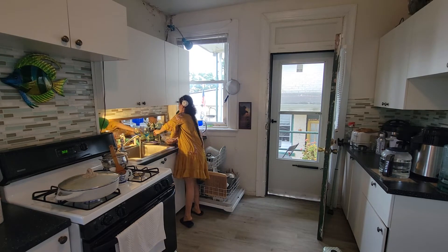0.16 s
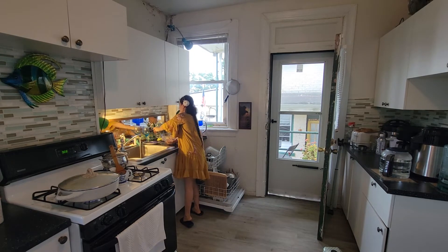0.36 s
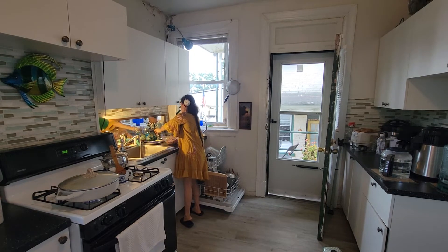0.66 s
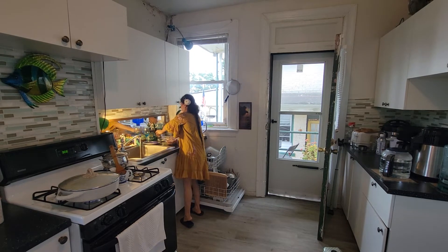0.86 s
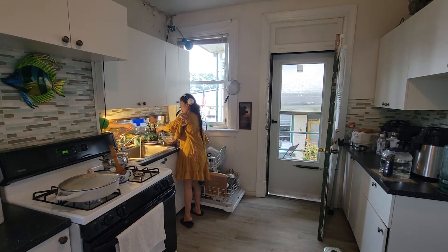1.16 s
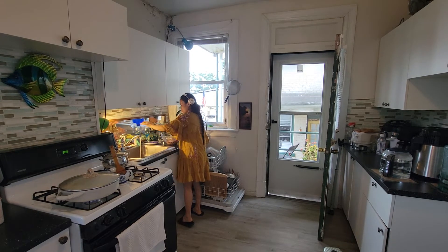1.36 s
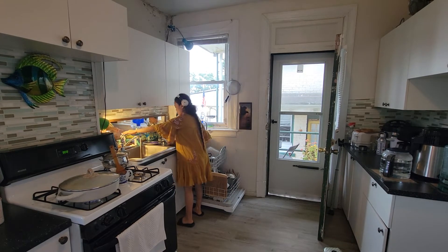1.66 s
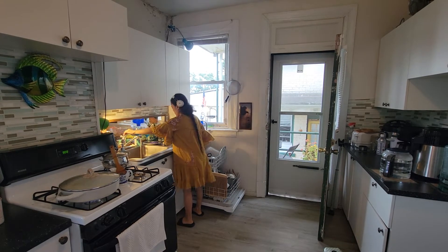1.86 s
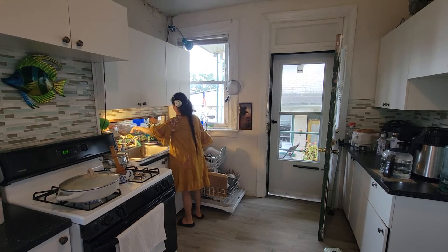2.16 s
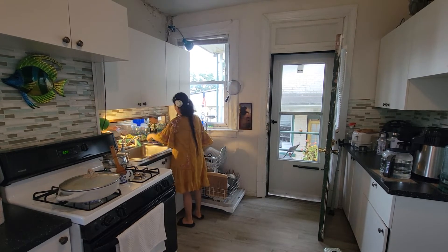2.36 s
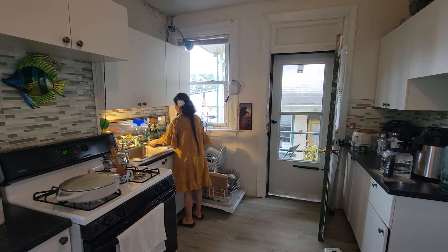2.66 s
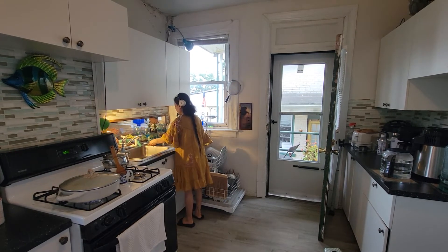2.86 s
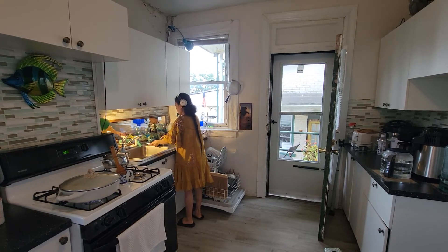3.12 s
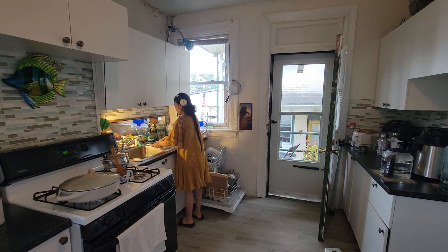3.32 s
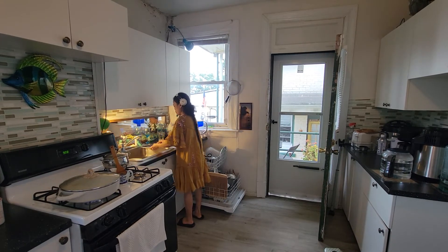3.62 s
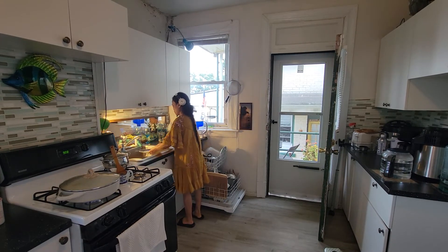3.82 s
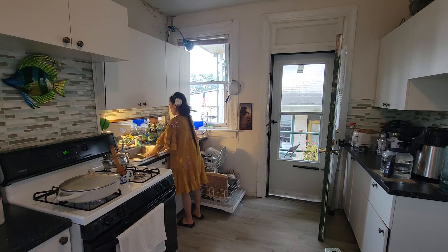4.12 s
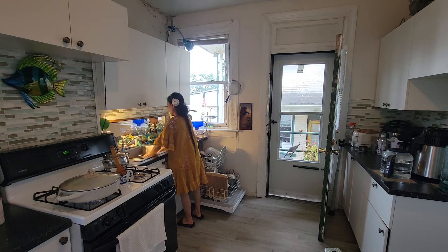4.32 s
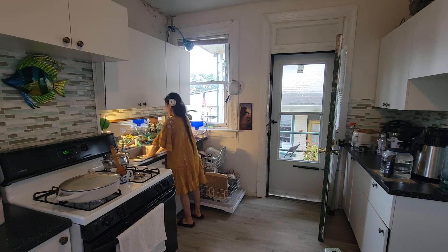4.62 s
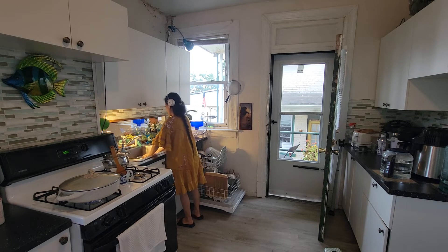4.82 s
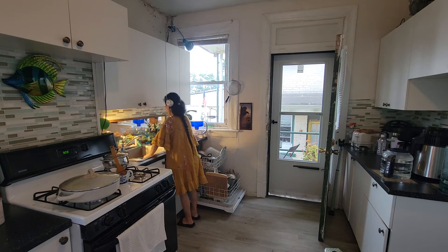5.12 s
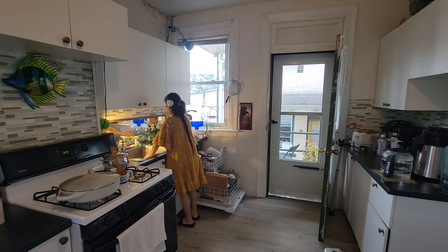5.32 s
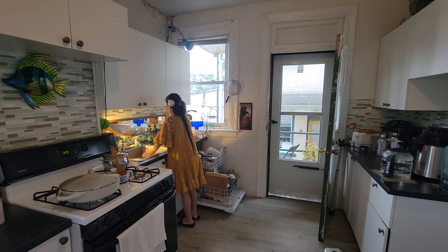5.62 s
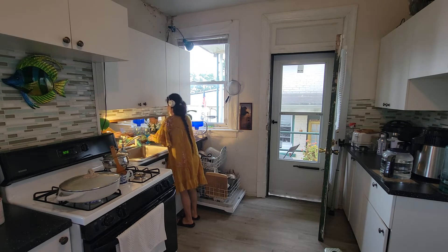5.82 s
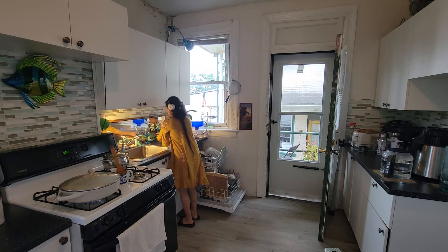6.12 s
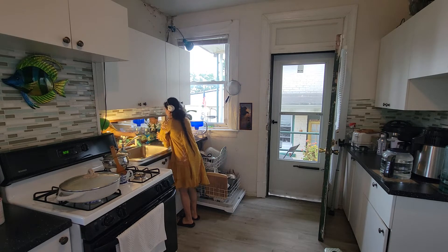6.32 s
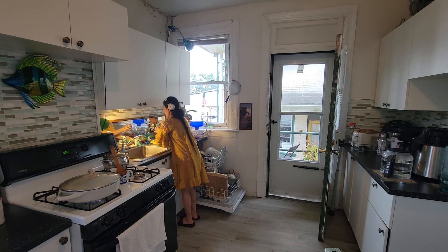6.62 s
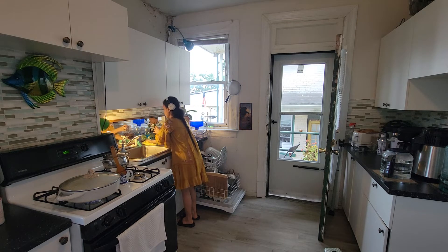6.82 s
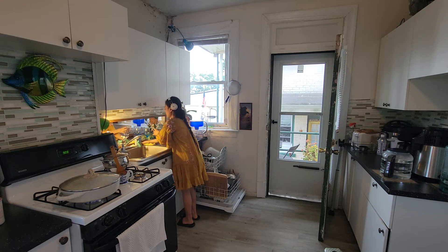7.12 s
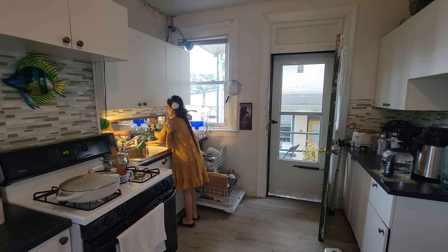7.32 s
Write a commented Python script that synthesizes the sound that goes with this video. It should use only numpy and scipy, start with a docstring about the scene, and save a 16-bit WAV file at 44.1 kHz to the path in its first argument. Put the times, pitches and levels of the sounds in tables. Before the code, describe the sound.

Dishes and cutlery knock, clatter and scrape in a steel sink after a thin tap stream shuts off, in a small quiet kitchen.

```python
"""A small hard-walled kitchen, heard from across the room by two close microphones: washing up in a steel sink.
Soft air noise and an appliance hum lie behind a thin tap stream, shaped noise that is shut off early on.
Dishes are knocked, set down and slid: contact pulses excite short clacks and decaying modes, random slips
make the rub, and the basin booms in a few low modes. Clacks, slides and splashes arrive by way of the walls."""
import sys
import numpy as np
from scipy import signal
from scipy.fft import rfft, irfft
from scipy.io import wavfile
from scipy.ndimage import uniform_filter1d

SR = 44100
rng = np.random.default_rng(int(sys.argv[2]) if len(sys.argv) > 2 else 0)


def output_pcm(signal):
    """Save a mono or channel-first signal as 16-bit PCM at the path in sys.argv[1].

    Samples are clipped to [-1, 1] before scaling.
    """
    pcm = np.clip(np.atleast_2d(signal).T, -1, 1) * 32767
    wavfile.write(sys.argv[1], SR, np.round(pcm).astype(np.int16))


N = 329781
TIME = np.arange(N) / SR
TAIL = TIME[:32768]  # time axis of every impulse response
TOP_HZ = 15850

# air of the room and a fainter hiss above it: (frequency [Hz], relative level [dB])
ROOM_TONE = [(15, -47), (25, -18), (40, -29), (59, 3), (90, -16.5), (125, -9), (156, -8.5), (362, -6.5),
             (437, -8.5), (1050, -12.5), (1500, -17), (1950, -43), (3300, -120)]
HISS = [(880, -27), (1500, -5.5), (1820, -1.5), (2920, -6), (3480, -6.5), (3990, -11), (6620, -12),
        (11200, -26.5), (15500, -21)]
ROOM_TONE_DB, HISS_DB = -53.5, -62.5
# appliance hum: (frequency [Hz], rms level [dB])
HUM = [(59.5, -73.5), (123, -67), (226, -69), (528, -69), (1039, -78)]
# spacing of the diffuse field at the microphones: (frequency [Hz], side minus mid [dB])
WIDTH = [(60, -11), (110, -18), (200, -8), (380, -2.5), (700, 1), (1290, 4.5), (2380, 0.5), (4400, 0),
         (15000, 0)]
# room; the treble is shadowed most and builds up more slowly: (frequency [Hz], t60 [s], build-up [s])
ROOM_DECAY = [(100, 0.49, 0.0012), (407, 0.33, 0.0014), (1500, 0.38, 0.001), (5000, 0.39, 0.0042),
              (8000, 0.38, 0.0026), (14000, 0.3, 0.0033)]

# tap stream: (time [s], level [dB])
TAP_FLOW = [(0, -48), (1.0, -47.5), (1.75, -48.5), (2.03, -50.5), (2.08, -55), (2.16, -55), (2.3, -72),
            (2.4, -120)]
# colour of its hiss: (frequency [Hz], relative level [dB])
TAP_COLOUR = [(250, 4), (500, 4), (1200, 6), (2300, 0.5), (3600, 2.5), (5200, 0), (7200, 3), (11000, -3),
              (15500, -0.5)]
# singing bands of the valve: (frequency [Hz], width [Hz], level against the hiss [dB])
TAP_PIPE = [(1635, 42, -13.5), (1920, 145, -10.5), (2792, 39, -17)]
# water spattering off a dish: (time [s], frequency [Hz], level [dB])
SPLASHES = [(.275, 3600, -50.5), (1.145, 3750, -53.5), (2.015, 2920, -54.5), (2.124, 2480, -55)]

# steel basin and the cabinet under it:
# (frequency [Hz], struck on the floor [dB], struck on the wall [dB], t60 before the hold factor [s])
SINK = [(65.3, -2.5, -19, 0.29), (123.5, 1, -11, 0.266), (158.1, 7.5, 2, 0.27), (194.3, 1.5, 4, 0.21),
        (233.3, -9, -10.5, 0.44), (364.5, -16.5, -16, 0.53)]
# heavy nudges of the basin, more boom than clack: (time [s], sink boom [dB], place)
BUMPS = [(1.639, -50.5, "wall"), (1.987, -51.5, "wall"), (2.436, -39, "floor"), (2.474, -36, "floor"),
         (2.59, -39.5, "wall"), (3.06, -51, "wall"), (3.181, -48, "wall"), (3.298, -36, "wall"),
         (3.455, -31.5, "wall"), (4.886, -52, "wall")]
BUMP_CLACK_DB, BUMP_BRIGHT_HZ = -3.5, 800  # clack against boom, contact brightness

# a rim catches and squeaks as it speeds up: (time [s], pitch [Hz], level [dB])
SQUEAK = [(4.915, 1430, -69), (4.945, 1490, -42), (4.974, 1695, -40), (4.999, 1700, -38), (5.03, 1770, -51)]
# dishes dragged over the sink floor, the last stopping short of its fastest:
# (start [s], fastest [s], end [s], level [dB], brightness [Hz], singing against rub [dB],
#  favoured pitch at the start [Hz], at the end [Hz])
SLIDES = [(2.66, 3.27, 3.7, -55, 7000, -6, 2000, 3000), (3.354, 3.457, 3.62, -38, 14000, -30, 2500, 2500),
          (4.6, 4.688, 4.73, -32.5, 10000, -5.5, 2190, 3200),
          (4.867, 4.977, 5.097, -33.5, 7000, -2, 1360, 4000),
          (5.395, 5.466, 5.42, -39.5, 3000, -4, 2400, 2000)]
# colour of the rub: (frequency [Hz], relative level [dB])
SLIDE_COLOUR = [(120, -20), (200, 3.5), (400, -18.5), (1000, -1), (1550, 2), (2300, -3.5), (3000, -6.5),
                (4000, -3.5), (7000, -10), (10000, -21), (15000, -23)]
# modes that sing under the rub: (frequency [Hz], relative level [dB], t60 [s])
SLIDE_RING = [(1460, -5, 0.067), (1700, -1, 0.091), (2170, -3.5, 0.034), (2520, 4, 0.034), (2820, 5, 0.02),
              (3700, 3, 0.029), (4040, 1, 0.03), (4740, -14, 0.025)]

# single knocks of a piece in the hand:
# (time [s], piece, level [dB], sink boom [dB], contact brightness [Hz])
KNOCKS = [(.877, "tub", -33.5, -38.5, 1500), (2.15, "pot", -58, -63, 3000), (2.516, "pot", -36, -45, 900),
          (2.80, "dish", -52, -55, 5000), (3.352, "dish", -34.5, -50, 4000), (3.432, "pot", -41, -36, 5000),
          (3.525, "pot", -39.5, -44, 4460), (3.637, "fork", -45, -67, 12200),
          (3.723, "plate", -25.5, -27, 14000), (4.34, "spoon", -44.5, -74, 16000),
          (4.352, "spoon", -42.5, -74, 16000), (4.476, "dish", -42.5, -51, 9000),
          (4.502, "bowl", -39, -40.5, 3000), (4.548, "bowl", -44, -72, 1200),
          (4.655, "spoon", -42, -75, 12000), (4.672, "spoon", -39.5, -73, 10000),
          (4.737, "bowl", -38.5, -47, 1500), (4.748, "dish", -36.5, -39, 5000),
          (5.265, "bowl", -38, -40.5, 9000), (5.365, "mug", -38.5, -49, 1400),
          (6.203, "tub", -52, -60, 220), (6.231, "tub", -55, -51.5, 200), (7.296, "dish", -51, -85, 14000),
          (7.439, "spoon", -50, -85, 16000)]
# pieces set down, edge first and then flat: (time when flat [s], piece, level [dB], sink boom [dB],
#  contact brightness [Hz], edge earlier by [s], edge against flat [dB])
LANDINGS = [(.841, "tub", -23, -51, 5000, 0.0045, -1), (2.36, "pot", -25.5, -27, 12000, 0.0091, -3),
            (2.545, "pot", -34.5, -33, 14000, 0.023, 1.5), (3.274, "dish", -25.5, -41.5, 16000, 0.009, -4),
            (3.708, "plate", -21.5, -33, 13200, 0.0068, -0.5),
            (4.378, "bowl", -25.5, -32.5, 11100, 0.004, -10.5),
            (5.29, "mug", -27.5, -40, 11000, 0.009, -8.5), (7.464, "dish", -38, -73, 12000, 0.007, -4)]
# the edge touches softly: share of the brightness, boom against its own level
EDGE_BRIGHTNESS, EDGE_BOOM_DB = 0.97, -13.5
# one small hop after landing, against the flat blow
REBOUND_S, REBOUND_DB, REBOUND_BOOM_DB = .021, -10, -35

# clack of each piece, its many quickly damped modes together: (frequency [Hz], relative level [dB])
TUB_CLACK = [(120, -46), (190, -22), (280, -7), (400, -6), (560, -3.5), (720, -4.5), (900, -9), (1170, -9),
             (1500, -16), (1850, -19), (2400, -33), (3000, -26), (4300, -37), (7000, -40), (15000, -100)]
POT_CLACK = [(150, -36), (250, 1), (318, -9.5), (450, -11), (660, -8), (830, -11.5), (1560, -17.5),
             (1860, -21), (2950, -21.5), (3380, -33.5), (3750, -24), (15000, -53)]
DISH_CLACK = [(150, -22), (250, 3.5), (364, -9), (470, -8), (599, 4.5), (788, -3), (1600, -0.5),
              (2020, -6.5), (2570, -5), (3320, -7.5), (6500, -16.5), (15000, -36.5)]
PLATE_CLACK = [(150, -17), (250, -2), (370, -12.5), (499, -17), (624, -4), (800, -3), (1140, -12),
               (1500, -3.5), (1800, -15.5), (2050, -6.5), (2500, -1.5), (3220, -9.5), (4100, -7),
               (9230, -18.5), (11000, -25), (15500, -22.5)]
BOWL_CLACK = [(150, -23), (250, -13), (323, -17.5), (433, -24), (531, -12.5), (600, -16), (968, -11.5),
              (1190, -21), (1540, -17), (2900, -17), (3300, -25.5), (3700, -17), (15000, -42.5)]
MUG_CLACK = [(150, -9.5), (260, -25), (375, 0), (450, -4.5), (750, -5.5), (1250, -4), (1700, -4.5),
             (2700, -5.5), (4000, -12), (6000, -19.5), (9000, -34.5), (15000, -49)]
SPOON_CLACK = [(240, -59), (400, -19), (1400, -8), (1530, -14), (2620, -18), (2860, -13), (4420, -15.5),
               (13000, -40)]
# modes that ring on: (frequency [Hz], relative level [dB], t60 before a cap of 0.5 [s])
TUB_RING = [(386.6, -5, 0.07), (459, -4, 0.046), (705, 2.5, 0.055), (932, -12.5, 0.1), (1165, -3, 0.042),
            (1800, -17, 0.053), (2265, -21, 0.097), (4136, -24, 0.07)]
POT_RING = [(389, -3, 0.39), (552.4, 2.5, 0.27), (625, 5, 0.16), (732, 1.5, 0.17), (1060, -4, 0.36),
            (1526, -17, 0.25), (2410, -15, 0.44), (3640, -9.5, 0.27), (4150, -6, 0.13), (4915, -15, 0.21)]
DISH_RING = [(402, 3.5, 0.5), (1400, 6, 0.33), (1605, 4.5, 0.25), (2632, 8, 0.23), (3047, 0, 0.27),
             (3940, 6, 0.18), (4936, -2, 0.3), (6070, -6, 0.36), (9100, -2, 0.13)]
PLATE_RING = [(413, 5, 0.42), (1290, 17, 0.27), (1600, 3, 0.52), (2000, -9, 0.19), (2130, 9, 0.3),
              (2500, 1, 0.26), (2860, 13, 0.22), (3060, 7, 0.15), (3920, 11, 0.27), (4100, 5, 0.28),
              (5130, 0, 0.28), (5700, -3, 0.21), (7600, 12, 0.23), (9006, -3, 0.25)]
BOWL_RING = [(313, -5.5, 0.55), (537, 8.5, 0.25), (1450, -7, 0.37), (1594, 1.5, 0.28), (2130, -10, 0.32),
             (3000, -5, 0.38), (3510, -6, 0.27), (4000, -14, 0.2), (4760, -10, 0.22), (5750, -7, 0.22),
             (7450, -7, 0.22)]
MUG_RING = [(381, 5, 0.28), (462, -4, 0.22), (1025, 8, 0.43), (1570, 0, 0.5), (1986, 5, 0.57),
            (2220, 7.5, 0.54), (2570, 6, 0.36), (2660, 6, 0.25), (2880, 12, 0.16), (3500, 7, 0.38),
            (4377, -1.5, 0.35), (5717, -1, 0.2)]
SPOON_RING = [(1560, -8, 0.3), (2470, -9.5, 0.27), (2700, -12, 0.18), (3600, -6, 0.28), (4000, -12, 0.31),
              (4530, -18, 0.45)]
FORK_RING = [(1700, -4, 0.28), (2500, -3, 0.18), (2590, 4, 0.17), (2670, -4, 0.16), (4000, -10, 0.16),
             (4170, -8, 0.24)]
# each piece by name: (clack, modes, ring against clack [dB])
PIECES = {"tub": (TUB_CLACK, TUB_RING, -1), "pot": (POT_CLACK, POT_RING, -8),
          "dish": (DISH_CLACK, DISH_RING, -7), "plate": (PLATE_CLACK, PLATE_RING, -11),
          "bowl": (BOWL_CLACK, BOWL_RING, -6), "mug": (MUG_CLACK, MUG_RING, -8),
          "spoon": (SPOON_CLACK, SPOON_RING, -7), "fork": (SPOON_CLACK, FORK_RING, -0.68)}
# decay of the chatter after a blow, by piece: time constant [s]
CHATTER_S = {"tub": 0.005, "pot": 0.0032, "dish": 0.0036, "plate": 0.0076, "bowl": 0.027, "mug": 0.0044,
             "spoon": 0.0074, "fork": 0.0044}


def undb(db):
    """Decibels to gain."""
    return 10 ** (np.asarray(db) / 20)


def unit(x):
    """Scale to an rms of one."""
    return x / np.sqrt(np.mean(x ** 2))


def impulse(x):
    """Scale a response to an energy of one."""
    return x / np.sqrt(np.sum(x ** 2))


def bins(size):
    """Frequencies of a real FFT."""
    return np.arange(size // 2 + 1) * SR / size


def along(points, hz):
    """Read (frequency [Hz], value) points on a log-frequency axis."""
    f, value = np.transpose(points)
    return np.interp(np.log(hz + 1), np.log(f), value)


def fade(t, t60):
    """Exponential decay, 60 dB down after t60."""
    return np.exp(-np.log(1000) * t / t60)


def walk(rate):
    """Slow random drift with a spread near one, through rate random points a second."""
    knots = rng.standard_normal(1024)
    return np.interp(TIME * rate, np.arange(len(knots)), knots)


def soften(x, hz):
    """One-pole low-pass: a softer, longer contact."""
    pole = np.exp(-2 * np.pi * hz / SR)
    return signal.lfilter([1 - pole], [1, -pole], x)


def add(track, s, x):
    """Mix x into the track at time s."""
    start = int(s * SR)
    track[start:start + len(x)] += x[:max(N - start, 0)]


def spread(pair):
    """Mid and side of a diffuse field to two close microphones, which share the bass."""
    size = pair.shape[1]
    width = undb(along(WIDTH, bins(size)))
    mid, side = rfft(pair)
    left_right = np.array([mid + width * side, mid - width * side])
    return irfft(left_right / np.sqrt(1 + width ** 2), size)


def diffuse(gain):
    """Stereo noise of unit rms with the given relative gain at each frequency."""
    noise = rfft(rng.standard_normal((2, N)))
    return unit(spread(irfft(noise * gain, N)))


def room_tone():
    """Soft steady air noise and the slightly wavering hum of an appliance."""
    air = diffuse(undb(along(ROOM_TONE, bins(N)))) * undb(ROOM_TONE_DB)
    hiss = diffuse(undb(along(HISS, bins(N)))) * undb(HISS_DB)
    waver_db = 2.5
    hum = 0
    for hz, db in HUM:
        level = np.sqrt(2) * undb(db + waver_db * walk(rate=9.3))
        hum = hum + level * np.sin(2 * np.pi * hz * TIME + 0.8 * walk(rate=11))
    return air + hiss + hum


def kitchen(x, even_hz=100):
    """The sink lies out of direct line: reflections crowd in within milliseconds, then die away."""
    hz = bins(len(TAIL))
    noise = rfft(rng.standard_normal((2, len(TAIL))))
    centres = np.log(np.array(ROOM_DECAY)[:, 0])
    tail = 0
    # overlapping bands, each with its own build-up and decay
    for share, (_, t60, build_s) in zip(np.eye(len(ROOM_DECAY)), ROOM_DECAY):
        band = irfft(noise * np.interp(np.log(hz + 1), centres, share))
        tail = tail + band * fade(TAIL, t60) * (1 - np.exp(-TAIL / build_s))
    tail = rfft(tail)
    # hard walls return all pitches about equally
    tail /= np.sqrt(uniform_filter1d(abs(tail) ** 2, int(even_hz / hz[1]), axis=1))
    response = spread(irfft(tail))[:, :len(TAIL) * 3 // 4]
    return signal.fftconvolve(x[None], response, axes=1)[:, :N]


def tap(flutter_db=1.0, spray_db=0.6):
    """The aerator hisses in separately fluttering bands; the valve sings in three more until it is closed."""
    hz = bins(N)
    power = impulse(undb(along(TAP_COLOUR, hz))) ** 2
    for centre_hz, width_hz, db in TAP_PIPE:
        resonance = impulse(1 / (1 + (2 * (hz - centre_hz) / width_hz) ** 2))
        power = power + undb(db) ** 2 * resonance ** 2
    stream = rfft(diffuse(np.sqrt(power)))
    octave = np.digitize(hz, [1000, 2300, 4500, 9000])  # roughly octave-wide bands
    spray = 0
    for k in np.unique(octave):
        spray = spray + irfft(stream * (octave == k), N) * undb(spray_db * walk(rate=38))
    flow_db = np.interp(TIME, *np.transpose(TAP_FLOW))
    return spray * undb(flow_db + flutter_db * walk(rate=46))


def contact(chatter_s, chatter_db=-4, rate=1500):
    """One blow, followed by tiny random rebounds, rate a second, that die away."""
    rebounds = (rng.random(len(TAIL)) < rate / SR) * rng.standard_normal(len(TAIL)) + 1e-9
    force = undb(chatter_db) * impulse(rebounds * np.exp(-TAIL / chatter_s))
    force[0] += 1
    return impulse(force)


def splashes(length_s=0.011, width=0.37):
    """The stream catches a dish: a short spatter of droplets, random pulses through a band-pass."""
    out = np.zeros(N)
    for s, hz, db in SPLASHES:
        band = signal.butter(2, [hz / (1 + width), hz * (1 + width)], "band", fs=SR, output="sos")
        spatter = signal.sosfilt(band, contact(length_s, chatter_db=-3))
        add(out, s, undb(db) * impulse(spatter))
    return out * np.sqrt(SR / 20)  # levels are rms over a twentieth of a second


def ring(modes, hold):
    """Decaying modes of alternating sign; a hold below one shortens them."""
    out = 0
    for k, (hz, db, t60) in enumerate(modes):
        decay = fade(TAIL, hold * np.clip(t60, .03, .7))
        out = out + (-1) ** k * undb(db) * np.sin(2 * np.pi * hz * TAIL) * decay
    return impulse(out)


def basin(place, hold):
    """Response of the sink: a blow on its floor or its wall stirs the same modes in another balance."""
    modes = [(hz, floor_db if place == "floor" else wall_db, t60) for hz, floor_db, wall_db, t60 in SINK]
    return ring(modes, hold)


def blows():
    """Every contact: (time [s], piece, level [dB], boom [dB], brightness [Hz], place in the basin)."""
    out = [(*knock, "wall") for knock in KNOCKS]
    # a landing is edge, full weight and one hop
    for s, name, db, boom_db, bright_hz, lead_s, edge_db in LANDINGS:
        edge_level_db = db + edge_db
        edge_bright_hz = bright_hz * EDGE_BRIGHTNESS
        out.append((s - lead_s, name, edge_level_db, edge_level_db + EDGE_BOOM_DB, edge_bright_hz, "floor"))
        out.append((s, name, db, boom_db, bright_hz, "floor"))
        out.append((s + REBOUND_S, name, db + REBOUND_DB, boom_db + REBOUND_BOOM_DB, bright_hz, "floor"))
    for s, boom_db, place in BUMPS:
        out.append((s, "pot", boom_db + BUMP_CLACK_DB, boom_db, BUMP_BRIGHT_HZ, place))
    return out


def booms(swell_s=0.0083):
    """The weight of each blow swells the low modes of the sink and the room around it."""
    swell = 1 - np.exp(-TAIL / swell_s)
    response = {place: impulse(basin(place, hold=0.98) * swell) for place in ("floor", "wall")}
    out = np.zeros(N)
    for s, _, _, boom_db, _, place in blows():
        add(out, s, undb(boom_db) * response[place])
    return out * np.sqrt(SR / 20)


def squeak(jitter=0.023, rough_db=3):
    """For a moment the slips fall into step: a rough, rising note."""
    s, hz, db = np.transpose(SQUEAK)
    wobble = unit(soften(rng.standard_normal(N), 324))
    pitch = np.interp(TIME, s, hz) * (1 + jitter * wobble)
    level = undb(np.interp(TIME, s, db) + rough_db * walk(rate=90))
    sounding = (TIME > s[0]) * (TIME < s[-1])
    return level * sounding * np.sin(2 * np.pi * np.cumsum(pitch) / SR)


def clack(points):
    """Short causal response with the given colour: minimum phase, by folding the cepstrum."""
    cepstrum = irfft(np.log(undb(along(points, bins(len(TAIL))))))
    cepstrum[1:] *= 2
    cepstrum[len(TAIL) // 2:] = 0
    return impulse(irfft(np.exp(rfft(cepstrum))))


def slides(slip_rate=1400, scatter_db=3, catch_db=2.5, wander_db=2.5, edge_db=-17, boom_db=-16,
           focus_db_per_octave=10):
    """Stick-slip clicks come in catches, swell with the speed of the dish and stir its modes and the sink."""
    clicks = (rng.random(N) < slip_rate / SR) * rng.choice([-1, 1], N)
    slips = clicks * undb(scatter_db * rng.standard_normal(N) + catch_db * walk(rate=55))
    body = clack(SLIDE_COLOUR) + undb(boom_db) * basin("wall", hold=0.7)
    rub = signal.fftconvolve(slips, body)[:N]
    modes = []
    for hz, db, t60 in SLIDE_RING:
        response = impulse(np.sin(2 * np.pi * hz * TAIL) * fade(TAIL, t60))
        level = undb(db + wander_db * walk(rate=23))
        modes.append((hz, level * signal.fftconvolve(slips, response)[:N]))
    out = np.zeros(N)
    for start, fastest, end, db, bright_hz, sing_db, from_hz, to_hz in SLIDES:
        now = (TIME > start) & (TIME < end)
        speed = undb(np.interp(TIME[now], [start, fastest, end], [edge_db, 0, edge_db]))
        # as the contact travels along the rim, the modes that it favours glide
        favoured = np.geomspace(from_hz, to_hz, len(speed))
        song = sum(mode[now] * undb(-focus_db_per_octave * abs(np.log2(hz / favoured))) for hz, mode in modes)
        drag = soften(unit(rub[now]) + undb(sing_db) * unit(song), bright_hz)
        out[now] += undb(db) * speed * unit(drag)
    return out


def knocks(swell_s=0.013, strike_db=2, count=3):
    """Each blow makes its piece clack at one of a few spots and stirs its modes in a new mix."""
    clacks = {name: clack(colour) for name, (colour, _, _) in PIECES.items()}
    spots, rings = np.zeros((count, N)), np.zeros((2, N))
    swell = 1 - np.exp(-TAIL / swell_s)
    for k, (s, name, db, _, bright_hz, _) in enumerate(blows()):
        force = soften(contact(CHATTER_S[name], chatter_db=3.5), bright_hz)
        blow = signal.fftconvolve(force, clacks[name])[:len(TAIL)]
        add(spots[k % count], s, undb(db) * impulse(blow))
        _, modes, ring_db = PIECES[name]
        mix_db = strike_db * rng.standard_normal(len(modes))
        # random phase for each mode in each of the two ring channels
        for channel in rings:
            tone = 0
            for (hz, mode_db, t60), lift_db in zip(modes, mix_db):
                wave = np.sin(2 * np.pi * (hz * TAIL + rng.random()))
                tone = tone + undb(mode_db + lift_db) * wave * fade(TAIL, min(t60, .5))
            add(channel, s, undb(db + ring_db) * impulse(soften(tone, bright_hz) * swell))
    return spots * np.sqrt(SR / 20), rings * np.sqrt(SR / 20)


def scene(boom_scatter_db=-11):
    """Dishes through the room, each spot with its own reflections, over boom, tap and room tone."""
    background = room_tone() + tap()
    boom = booms()  # its long waves reach both microphones alike
    handling = kitchen(slides() + squeak() + splashes() + undb(boom_scatter_db) * boom)
    spots, rings = knocks()
    clatter = sum(kitchen(spot) for spot in spots)
    return background + boom + handling + clatter + spread(rings)


def record(dry):
    """The microphone signal is cut off steeply at the top by an elliptic low-pass."""
    return signal.sosfilt(signal.ellip(10, .1, 80, TOP_HZ, fs=SR, output="sos"), dry)


dry = scene()
out = record(dry)
output_pcm(out)
```